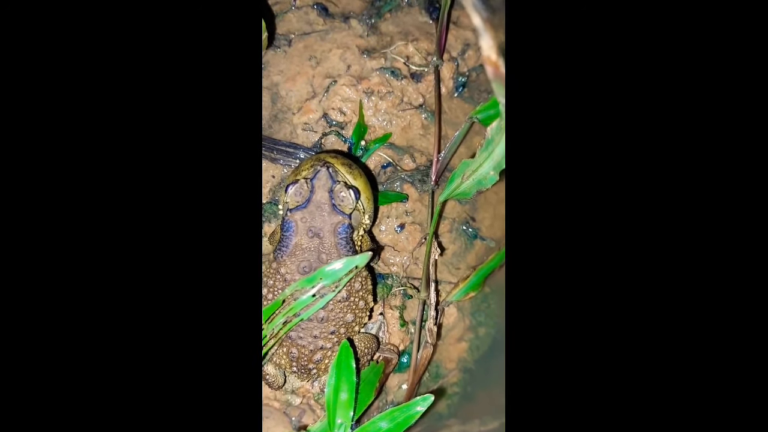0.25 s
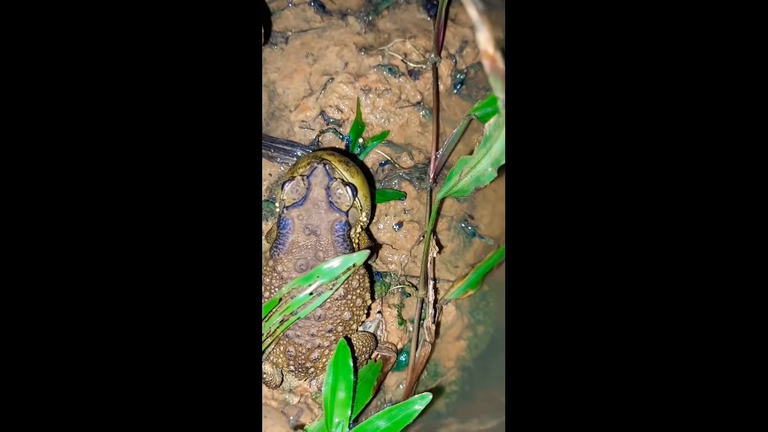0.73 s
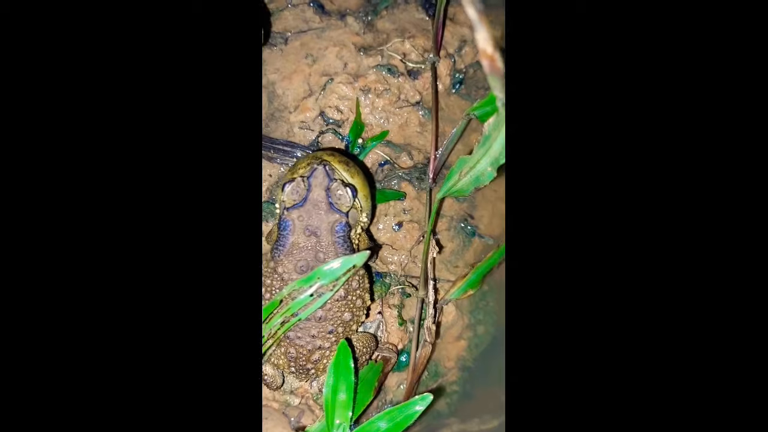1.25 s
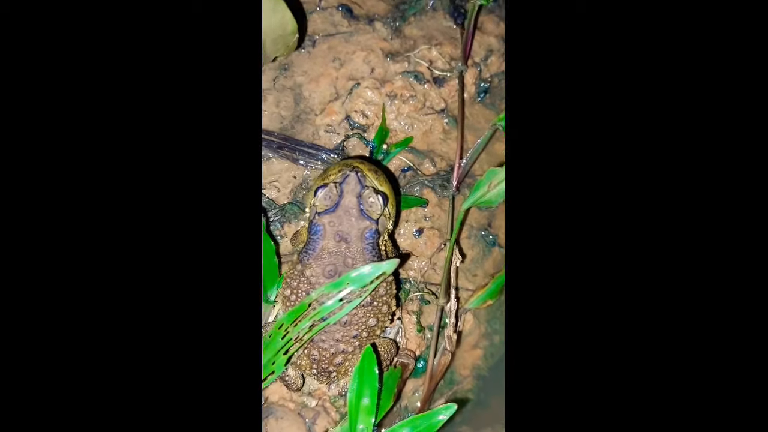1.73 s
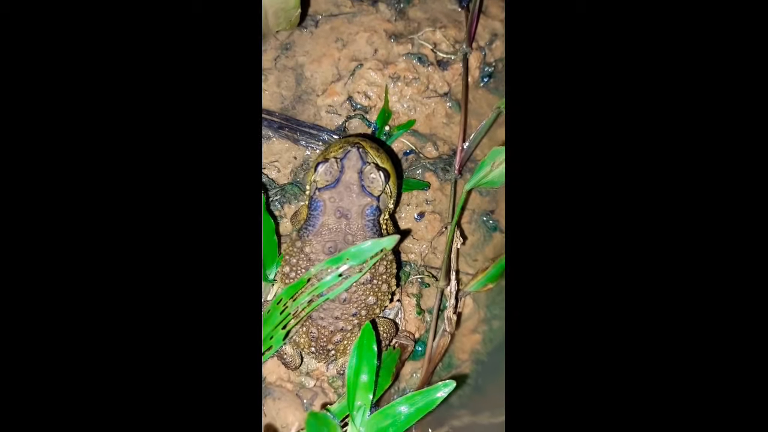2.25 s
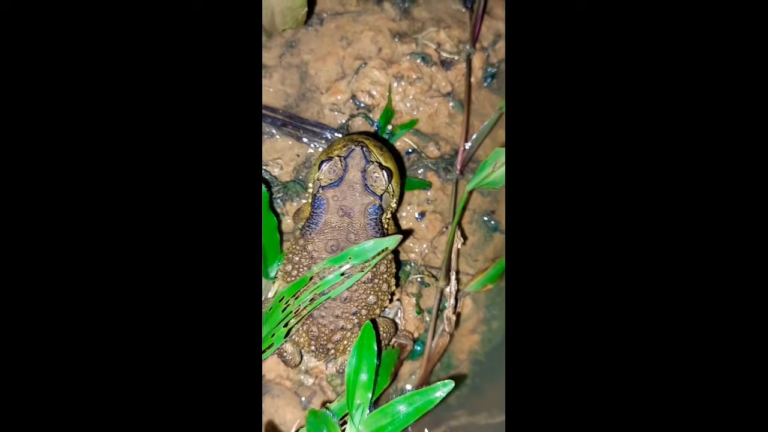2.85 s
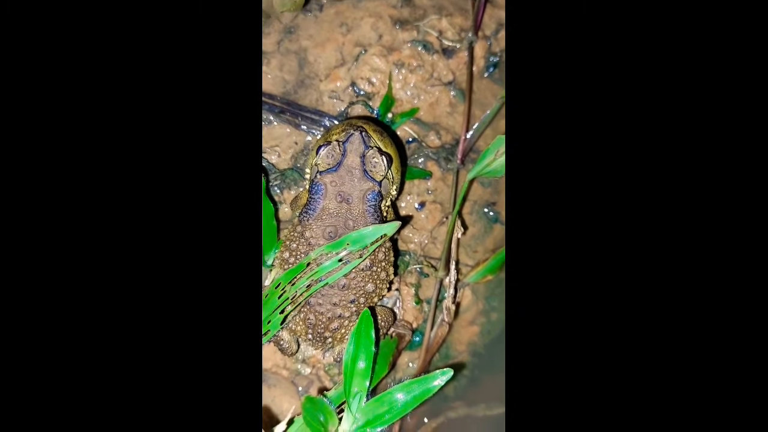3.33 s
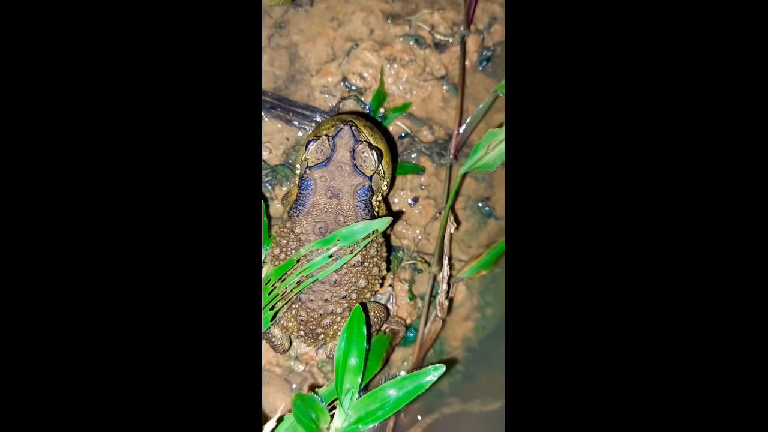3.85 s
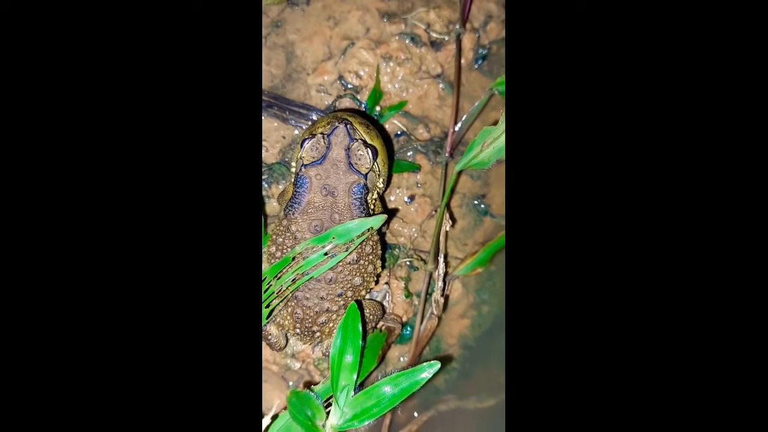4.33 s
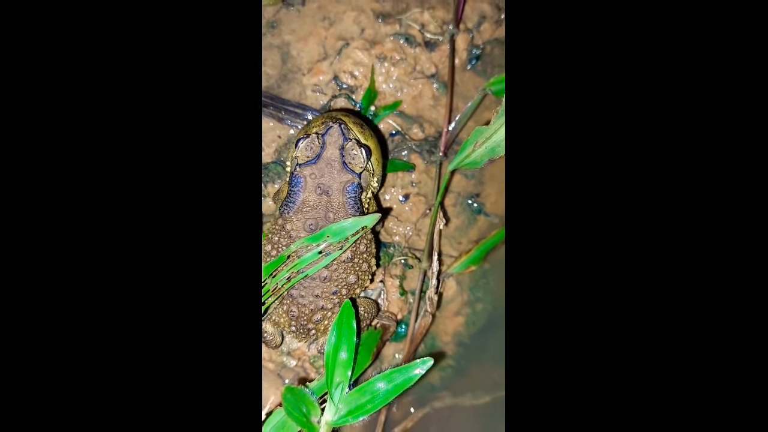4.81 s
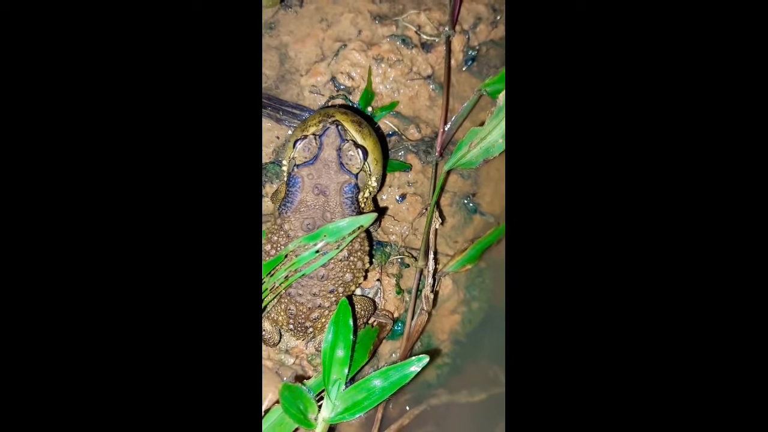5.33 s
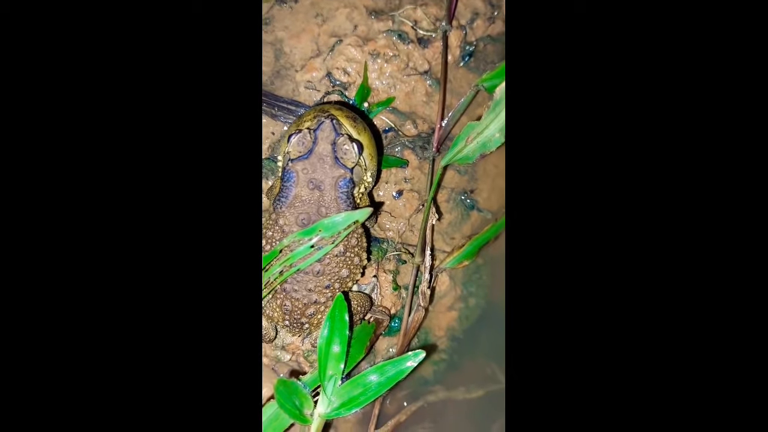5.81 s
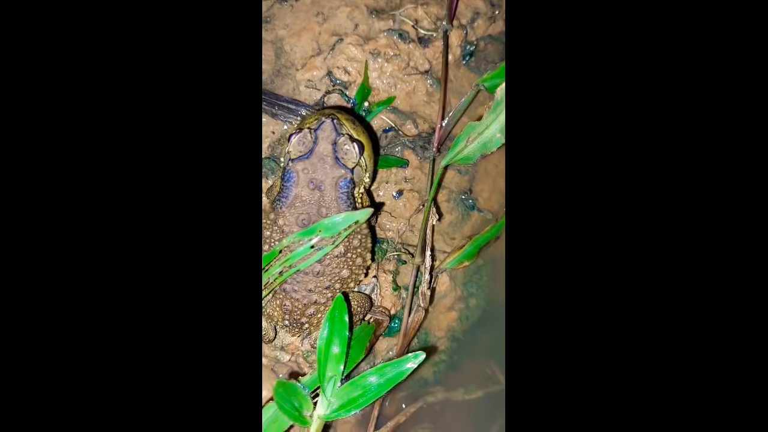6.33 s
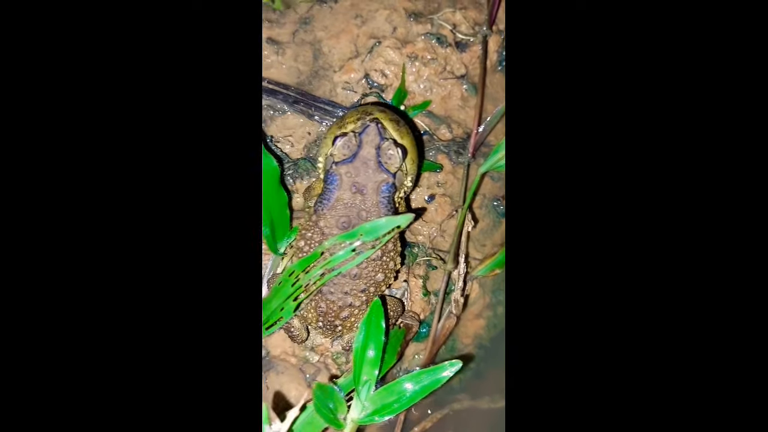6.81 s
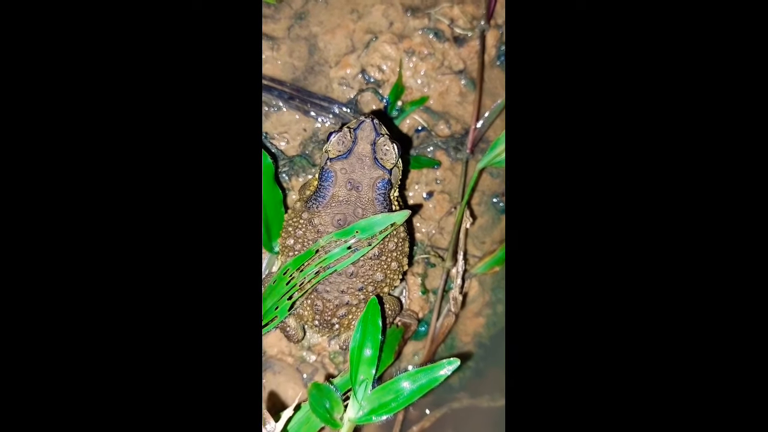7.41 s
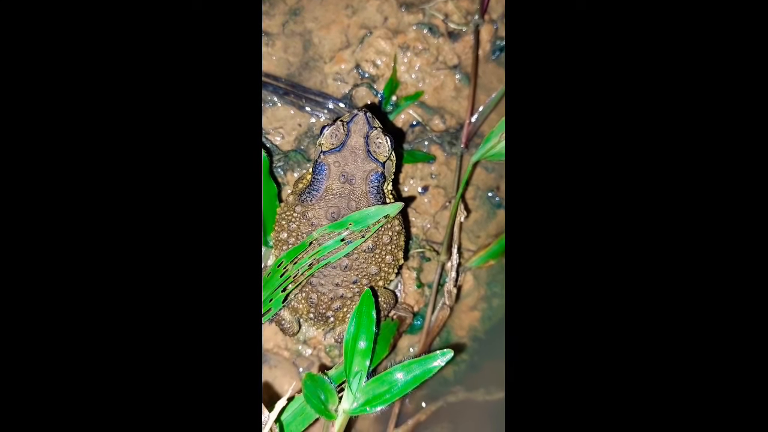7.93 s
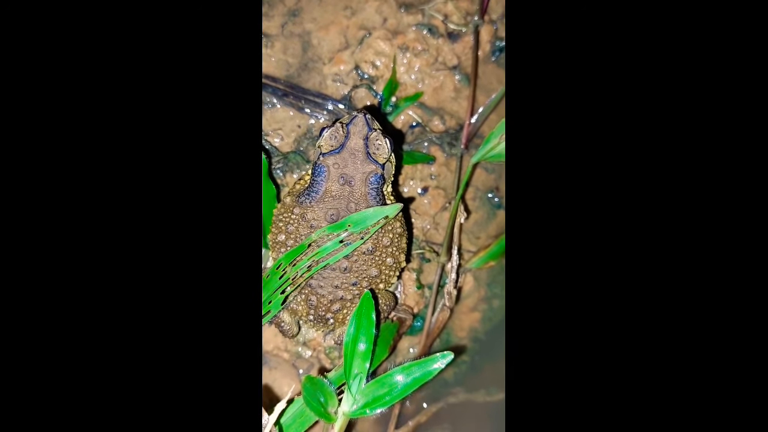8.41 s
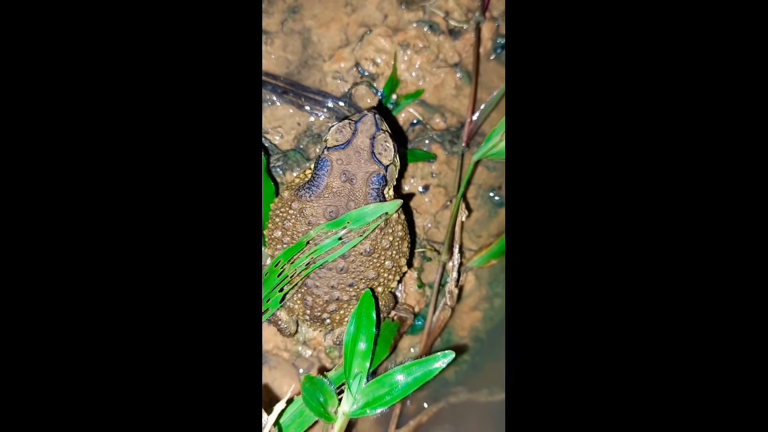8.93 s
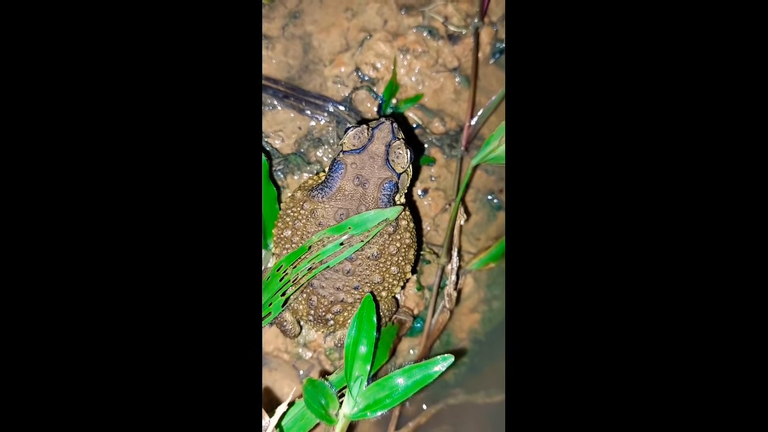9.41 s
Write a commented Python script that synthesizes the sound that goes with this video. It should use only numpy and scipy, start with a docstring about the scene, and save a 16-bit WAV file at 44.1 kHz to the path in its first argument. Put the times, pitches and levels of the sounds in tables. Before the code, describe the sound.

A toad trills loudly from the start, right beside a stereo microphone outdoors at night. Its ringing, pulsed notes hold a steady pitch, about six a second at first, gradually lengthening and slowing to about four; the loudest have a slightly overloaded, clicky edge on the right. A second toad trills behind it, with faint high crickets, a peeping frog and a dryly ticking frog. Near 7 seconds the close toad pauses, and the second toad, the surrounding chorus and soft night air swell up. At about 7.3 seconds a frog on the left adds a second of quick rattling croaks. From 8 seconds another gives thin, high whistles in groups of three while the crickets chirp faster. At about 9.5 seconds the close toad starts again with a few lower, sagging pulses.

```python
"""Night, a stereo microphone right beside a toad. It trills from the start: pulses set its vocal sac ringing in
short bursts, each note closed by a held tone, and the loudest overload the right channel. A neighbour trills
behind it; crickets, a peeping frog and a ticking frog call around. Near 7 s the close toad pauses and the
recorder's gain control lets the chorus swell. A rattling frog joins, then from 8 s a high insect chirping in
threes. In the last moment the close toad starts again with a slack sac."""
import sys
import numpy as np
from scipy import signal
from scipy.io import wavfile
from scipy.ndimage import uniform_filter1d

SR = 44100
rng = np.random.default_rng(int(sys.argv[2]) if len(sys.argv) > 2 else 0)


def unload_audio(sound):
    """Save the sound as a 16-bit wav file, at the path given as the first command line argument."""
    columns = np.transpose(np.atleast_2d(sound))
    # keep every value between -1 and 1, then stretch to whole-number steps
    steps = np.round(np.clip(columns, -1, 1) * 32767)
    wavfile.write(sys.argv[1], SR, steps.astype(np.int16))


N = 426006
TIME = np.arange(N) / SR


def from_db(db):
    """Gain of a level."""
    return 10 ** (np.asarray(db) / 20)


def gain_curve(rows):
    """Gain at every sample from rows of (time [s], level [dB])."""
    return from_db(np.interp(TIME, *np.transpose(rows)))


def bandpass(x, low_hz, high_hz, order=2):
    """Keeps the band between two frequencies."""
    return signal.sosfilt(signal.butter(order, [low_hz, high_hz], "band", fs=SR, output="sos"), x)


def ring(clicks, hz, t60):
    """A resonance: a unit click sets off a dying sine of height 1."""
    r, w = from_db(-60 / (t60 * SR)), 2 * np.pi * hz / SR
    return signal.lfilter([0, np.sin(w)], [1, -2 * r * np.cos(w), r * r], clicks + 1e-18)


def place(x, pan_db, lag_s):
    """A caller's bearing at the microphone: left louder by pan_db, right later by lag_s."""
    return np.array([from_db(pan_db / 2) * x, from_db(-pan_db / 2) * np.interp(TIME - lag_s, TIME, x)])


def since(starts, t, choke_s):
    """Index and age of the latest pulse, and a gate that closes just before the next one."""
    k = np.clip(np.searchsorted(starts, t) - 1, 0, None)
    remaining = np.append(starts[1:], 99)[k] - t
    gate = np.sin(np.pi / 2 * np.clip(remaining / choke_s, 0, 1)) ** 2
    return k, np.maximum(t - starts[k], 0), gate


def night_air(flicker_db=5.0):
    """Far chorus and air: half-octave bands of noise, each flickering on its own."""
    # distant spectrum: (frequency [Hz], relative density [dB])
    spectrum = [(40, -30.5), (80, -12.5), (200, -41), (400, -44.5), (650, -14), (1000, -25.5), (1410, -8.5),
                (2000, -14), (2650, -19.5), (3400, -26), (4300, -28.5), (5400, -25), (7000, -35.5),
                (9000, -30.5), (11000, -59), (15000, -69)]
    hz, density_db = np.transpose(spectrum)
    out, edges = 0, 30 * 2 ** np.arange(0, 9.2, .5)
    white = rng.standard_normal((2, 2, N))
    for k, (low, high) in enumerate(zip(edges, edges[1:])):
        level_db = np.interp(np.log(low * high) / 2, np.log(hz), density_db)
        flicker = np.interp(TIME * 25, np.arange(400), rng.standard_normal(400))
        out = out + bandpass(white[k % 2], low, high) * from_db(level_db + flicker_db * flicker)
    return out / out.std()


def echoes(x):
    """Adds two dull echoes off ground and plants."""
    dull = signal.sosfilt(signal.butter(2, 3000, fs=SR, output="sos"), x)
    return x + sum(from_db(db) * np.roll(dull, int(s * SR), axis=1)
                   for s, db in [(.0117, -27.5), (.023, -31)])


def crickets(duty=.74, strokes_hz=124, fall_hz=700):
    """Wing strokes that fall in pitch, in even chirps with a softer trill between them."""
    # chirp centres: (time [s], chirp number)
    centres = [(0.144, 0), (1.874, 12), (3.595, 24), (5.319, 36), (7.038, 48), (7.608, 52), (8.176, 56),
               (8.608, 59), (9.05, 62), (9.641, 66)]
    # loudness: (time [s], level [dB])
    levels = [(0, -33), (6.9, -36), (7.3, -30.5), (9, -29), (9.66, -27)]
    s, number = np.transpose(centres)
    count = np.interp(TIME, [s[0] - 1, *s, s[-1] + 1], [number[0] - 7, *number, number[-1] + 7])
    inside = ((count + duty / 2) % 1) / duty
    chirp = np.clip(inside / .1, .25, 1) * np.clip((1 - inside) / .09, .25, 1)
    stroke = (strokes_hz * TIME + .004 * np.cumsum(rng.standard_normal(N))) % 1
    sweep = np.cumsum(fall_hz * (.5 - stroke)) / SR
    wings = 0
    for hz, db in [(8980, 0), (9550, -9)]:
        waver = .1 * np.cumsum(rng.standard_normal(N))
        wings += from_db(db) * np.sin(2 * np.pi * (hz * TIME + sweep) + waver)
    return gain_curve(levels) * chirp * np.sin(np.pi * stroke) ** 2 * wings


def whistles(starts, level_db, start_hz, fall_hz, length_s, rough):
    """Short wavering whistles that fall in pitch."""
    k, age, gate = since(starts, TIME, choke_s=.002)
    hz = start_hz * (1 + .02 * rng.standard_normal(len(starts)))
    turns = hz[k] * age - fall_hz * age ** 2 / (2 * length_s)
    waver = rough * np.cumsum(rng.standard_normal(N))
    arch = np.sin(np.pi * np.clip(age / length_s, 0, 1))
    return from_db(level_db[k]) * arch * gate * np.sin(2 * np.pi * turns + waver)


def peeping_frog(every_s=.042, jitter_s=.0036):
    """A small frog whistles on at an uneven pace."""
    # peep peaks: (time [s], relative level [dB])
    levels = [(0, -32.5), (6.9, -36), (7.3, -35), (8.2, -33.5), (9.66, -30.5)]
    beats = np.arange(.02, N / SR, every_s)
    early_late, soft_loud = rng.standard_normal((400, 2))[:len(beats)].T
    starts = beats + jitter_s * np.clip(early_late, -2, 2)
    level_db = np.interp(beats, *np.transpose(levels)) - 2 + 2.17 * soft_loud
    return whistles(starts, level_db, start_hz=3560, fall_hz=320, length_s=.022, rough=.03)


def high_insect(first_s=8.047, every_s=.244, gap_s=.046):
    """Thin whistles in groups of three at a steady pace."""
    # peak of each group: (relative level [dB])
    group_db = (-30, -26, -24.5, -24, -24.5, -26.5, -28)
    # each whistle within a group: (relative level [dB])
    whistle_db = (-5, -1, -0.5)
    starts, level_db = np.transpose([(first_s + every_s * group + gap_s * k, peak_db + db - 10)
                                     for group, peak_db in enumerate(group_db)
                                     for k, db in enumerate(whistle_db)])
    return whistles(starts, level_db, start_hz=5730, fall_hz=850, length_s=.03, rough=.11)


def ticking_frog(first_s=.045, every_s=.0258):
    """A run of dry ticks, each a click with a brief ring."""
    # loudness: (time [s], relative level [dB])
    levels = [(0, -18.5), (6.9, -24), (7.1, -16), (8.4, -22), (8.5, -44), (8.75, -16.5), (9.66, -21.5)]
    beats = np.arange(first_s, N / SR - .01, every_s)
    early_late, soft_loud = rng.standard_normal((500, 2))[:len(beats)].T
    clicks = np.zeros(N)
    clicks[((beats + .001 * early_late) * SR).astype(int)] = from_db(2.5 * soft_loud)
    return gain_curve(levels) * ring(bandpass(clicks + 1e-18, 1800, 4000), hz=2730, t60=.0041)


def rattling_frog(first_s=7.299, every_s=.0775, count=14):
    """Five uneven pulses a croak ring a wide throat; the croaks slow down and grow louder."""
    # throat resonances: (frequency [Hz], t60 [s], level [dB])
    throat = [(654, 0.044, 2), (2110, 0.027, 7.5), (2440, 0.035, -1.5)]
    clicks, pulse = np.zeros(N), np.arange(5)
    for k, jitter in enumerate(rng.standard_normal((count, 5))):
        start = first_s + every_s * k + .0002 * k ** 2
        croak_db = -30 + .2254 * k + 1.5 * jitter[0]
        times = start + .0088 * pulse + .000438 * jitter
        clicks[(times * SR).astype(int)] = from_db(croak_db + .5 * jitter - .59 * pulse)
    soft = bandpass(1.21 * clicks + 1e-18, 480, 3000, order=3)
    return sum(from_db(db) * ring(soft, hz, t60) for hz, t60, db in throat)


def toad_pulses(notes, rest, per_pulse, opening_extra, hurry, opening_gap_s, gap_s, closing_gap_s):
    """Spreads each note's bursts, more pulses meaning a longer wait: rows of (time [s], held tone [s])."""
    pulses, previous = [], -1
    for start, close, held_ms, (*counts, closing_count) in notes:
        waits = rest + per_pulse * np.array(counts, float)      # relative lengths
        waits[0] += opening_extra * counts[0]
        waits[-1] -= hurry
        bursts = start + (close - start) * (np.cumsum(waits) - waits) / waits.sum()
        for s, count in zip(bursts, counts):
            step = opening_gap_s if s - previous > .045 else gap_s
            pulses += [(s + step * k, 0) for k in range(count)]
            previous = pulses[-1][0]
        pulses += [(close + closing_gap_s * k, 0) for k in range(closing_count)]
        pulses.append((pulses[-1][0] + .0049, held_ms / 1000))
    return sorted(pulses)


def vocal_sac(pulses, modes, lag_s, fall_hz, held_db, rise_s, damp_s, octave_db, third_mode_rad):
    """Each pulse restarts a toad's ringing sac; the closing burst runs into a held tone that falls."""
    starts, held_s = np.transpose(pulses)
    wait = np.diff(starts, prepend=-1)
    opens_note, opens_burst = wait > .035, wait > .008
    click_db = 3.5 * opens_note + 7.5 * opens_burst      # first pulses click more
    detune, soft_loud, early_late = rng.standard_normal((len(starts), 3)).T
    pulse_db = .7 * soft_loud + .5 * opens_note
    starts = starts - .0001 + .00019 * np.clip(early_late, -2, 2)
    out = np.zeros((2, N))
    for side in (0, 1):
        k, age, gate = since(starts, TIME - side * lag_s, choke_s=.0016)
        live = age < .04
        k, age, gate = k[live], age[live], gate[live]
        holds = held_s[k] > 0
        stretched = age + .00008 * (1 - np.exp(-age / .00018))      # each pulse starts sharp
        for mode, (hz, t60, *side_db, lag_rad) in enumerate(modes):
            decay = from_db(-60 * age / t60) * np.exp(-(age / damp_s) ** 2)
            turns = hz * (1 + .008 * detune[k]) * stretched
            if mode == 1:      # the main resonance is driven on through the held tone
                fade = np.cos(np.pi / 2 * np.clip((age - held_s[k]) / .007 + .6, 0, 1))
                decay = np.where(holds, from_db(held_db) * fade, decay)
                turns -= holds * fall_hz * age ** 3 / (3 * (held_s[k] + .0069) ** 2)
            rise = 1 - np.exp(-(age * max(hz / 2000, 1) / rise_s) ** 2)      # the click speaks first
            phase = 2 * np.pi * (turns + side * hz * lag_s) - side * lag_rad
            tone = np.sin(phase + (mode == 2) * third_mode_rad)
            octave = (mode == 1) * holds * from_db(octave_db) * np.sin(2 * phase)
            gain = from_db(side_db[side] + pulse_db[k] + (hz > 4000) * click_db[k])
            out[side, live] += gain * rise * decay * gate * (tone + octave)
    return out


def neighbour_toad(held_ms=10.8):
    """The toad farther back: long notes take one burst more, and fill out when the close toad pauses."""
    # notes: (start [s], closing burst [s])
    times = [(.1167, .17), (.213, .2734), (.4032, .465), (.5451, .605), (.707, .7651), (.8796, .94),
             (.992, 1.0546), (1.146, 1.208), (1.29, 1.352), (1.4361, 1.5), (1.5895, 1.65), (1.725, 1.783),
             (1.88, 1.9416), (2.03, 2.092), (2.19, 2.25), (2.3437, 2.405), (2.5009, 2.555), (2.648, 2.7089),
             (2.82, 2.8833), (2.968, 3.03), (3.1189, 3.18), (3.271, 3.3334), (3.442, 3.522),
             (3.615, 3.6804), (3.78, 3.847), (3.95, 4.012), (4.119, 4.18), (4.2827, 4.3398),
             (4.452, 4.5319), (4.63, 4.7), (4.785, 4.85), (4.968, 5.033), (5.13, 5.2083), (5.29, 5.355),
             (5.4663, 5.53), (5.642, 5.7219), (5.83, 5.9106), (5.995, 6.06), (6.1644, 6.228),
             (6.32, 6.3996), (6.495, 6.56), (6.6596, 6.725), (6.84, 6.9218), (7.0201, 7.0817),
             (7.181, 7.2444), (7.3402, 7.4041), (7.5021, 7.5672), (7.6656, 7.7439), (7.8411, 7.9063),
             (8.0113, 8.0759), (8.1735, 8.2402), (8.339, 8.4193), (8.5191, 8.5853), (8.6877, 8.7673),
             (8.8706, 8.9504), (9.0534, 9.1323), (9.2317, 9.3147), (9.4138, 9.4943), (9.5925, 9.657)]
    # loudness: (time [s], level [dB])
    effort = [(0, 0.24), (3, 0.23), (6.8, 0.2), (7.4, 6.4), (7.9, 0.56), (8.4, 3.5), (9.66, 4.2)]
    # sac resonances: (frequency [Hz], t60 [s], left [dB], right [dB], right lag [rad])
    modes = [(966, 0.029, -35, -30, -1.5), (1396.5, 0.062, -6.5, 0, -3.5), (1636, 0.036, -14, -9.5, -4.5),
             (2685, 0.015, -35.5, -38, 1.3)]
    short, shy, full = (3, 1, 2, 4), (3, 1, 1, 1, 4), (3, 1, 2, 1, 4)      # pulses per burst
    notes = [(start, close, held_ms, short if close - start < .072 else shy if start < 6.8 else full)
             for start, close in times]
    pulses = toad_pulses(notes, rest=7.8, per_pulse=4.92, opening_extra=2.2, hurry=.28,
                         opening_gap_s=.0063, gap_s=.0074, closing_gap_s=.0061)
    return gain_curve(effort) * vocal_sac(pulses, modes, lag_s=-.00055, fall_hz=200, held_db=-3.5,
                                          rise_s=.00084, damp_s=.0077, octave_db=-27, third_mode_rad=.15)


def slack_sac():
    """The close toad starts again: low, sagging pulses with a faint octave and a brief subharmonic."""
    # pulses: (time [s], relative level [dB], pitch [Hz], t60 [s])
    pulses = [(9.545, 13, 1190, 0.0112), (9.556, 2.5, 1190, 0.029), (9.58, 8, 1156, 0.071),
              (9.606, 5, 1196, 0.13), (9.6134, 12, 1310, 0.019), (9.623, 9, 1290, 0.029),
              (9.628, 6.5, 1211, 0.55)]
    starts, level_db, hz, t60 = np.transpose(pulses)
    k, age, gate = since(starts, TIME, choke_s=.00068)
    phase = 2 * np.pi * hz[k] * age * (1.0197 - 1.7 * age)
    body = np.sin(phase) + .05 * np.sin(2 * phase) + .34 * np.exp(-age / .0032) * np.sin(phase / 2)
    rise = 1 - np.exp(-(age / .00074) ** 2)
    decay = from_db(level_db[k] - 5 - 60 * age / t60[k])
    return place(rise * decay * gate * body, pan_db=-4, lag_s=.00031)


def close_toad():
    """The toad right at the microphone: its notes lengthen and soften as the trill goes on."""
    # notes: (start [s], closing burst [s], held tone [ms], pulses in each burst)
    notes = [(.0136, .0488, 11.4, (2, 2, 5)), (.1495, .1859, 9.8, (2, 2, 5)),
             (.2908, .3439, 16.5, (2, 2, 2, 4)), (.4416, .4908, 10.7, (2, 2, 2, 5)),
             (.5995, .6665, 10, (2, 2, 2, 2, 5)), (.7769, .8281, 11.4, (2, 2, 2, 5)),
             (.9349, 1.0022, 9.5, (2, 2, 2, 2, 5)), (1.1097, 1.1807, 13.5, (2, 2, 2, 2, 4)),
             (1.2864, 1.3549, 9.1, (2, 2, 2, 2, 5)), (1.4621, 1.534, 13.5, (2, 2, 2, 2, 4)),
             (1.6397, 1.708, 11.1, (2, 2, 2, 2, 5)), (1.8163, 1.8852, 12.1, (2, 2, 2, 2, 5)),
             (1.9886, 2.0557, 11.7, (2, 2, 2, 2, 5)), (2.1666, 2.2568, 14.2, (2, 2, 2, 2, 2, 4)),
             (2.3703, 2.4392, 12.4, (2, 2, 2, 2, 5)), (2.5459, 2.632, 9.8, (2, 2, 2, 2, 2, 5)),
             (2.7436, 2.8292, 10.1, (2, 2, 2, 2, 2, 5)), (2.9375, 3.0084, 9.3, (3, 1, 2, 2, 8)),
             (3.1379, 3.2266, 10.4, (2, 2, 2, 2, 2, 4)), (3.3393, 3.41, 13.8, (3, 2, 2, 2, 7)),
             (3.5387, 3.6243, 12.2, (2, 1, 2, 2, 2, 5)), (3.7257, 3.8136, 9.3, (3, 2, 2, 1, 2, 5)),
             (3.9226, 4.0117, 8.1, (3, 2, 2, 2, 2, 5)), (4.1245, 4.2309, 9, (3, 2, 2, 1, 2, 2, 5)),
             (4.3473, 4.4502, 13.7, (2, 1, 2, 1, 2, 2, 7)), (4.5767, 4.6812, 10, (3, 1, 2, 2, 2, 2, 5)),
             (4.8029, 4.8898, 8.7, (2, 2, 2, 1, 2, 8)), (5.0165, 5.1211, 9.9, (3, 2, 2, 1, 2, 2, 5)),
             (5.2385, 5.3631, 8.1, (3, 2, 1, 2, 1, 2, 2, 5)),
             (5.4959, 5.6357, 13.7, (3, 2, 1, 1, 2, 1, 2, 2, 4)),
             (5.7553, 5.8615, 11.4, (3, 1, 2, 1, 2, 2, 5)), (5.982, 6.103, 8.1, (2, 2, 2, 1, 2, 2, 2, 5)),
             (6.2208, 6.3299, 10.4, (3, 2, 2, 1, 2, 2, 5)), (6.4881, 6.5946, 11.4, (3, 1, 2, 1, 2, 2, 5)),
             (6.7074, 6.8311, 8.7, (3, 2, 1, 2, 2, 2, 2, 5))]
    # calling effort: (time [s], level [dB])
    effort = [(0, 16), (3, 14), (7, 11)]
    # the sac's ring and, above 4 kHz, the bright, overloaded click at the start of each pulse:
    # (frequency [Hz], t60 [s], left [dB], right [dB], right lag [rad])
    ring_and_click = [(653, 0.022, -25, -21.5, 0.71), (1431.3, .03, -3.5, -0.5, 2.386),
                      (1821, 0.0091, -10, -8.5, 2.85), (2980, 0.012, -36, -32, 2.34),
                      (4440, 0.0052, -38.5, -41, 3.7), (7100, 0.0028, -43, -45.5, 3.1)]
    # the thin top of the click: same columns
    sizzle = [(12000, .003, -42, -43, 2.6)]
    pulses = toad_pulses(notes, rest=21, per_pulse=1.45, opening_extra=3.1, hurry=.76,
                         opening_gap_s=.0069, gap_s=.0062, closing_gap_s=.0059)
    trill = vocal_sac(pulses, ring_and_click + sizzle, lag_s=.00008, fall_hz=168, held_db=-4.5,
                      rise_s=.00087, damp_s=.034, octave_db=-42.5, third_mode_rad=2.51)
    return gain_curve(effort) * trill


def scene():
    """What reaches the microphone: two toads, the crickets and frogs around them, the night air."""
    toads = close_toad() + neighbour_toad() + slack_sac()
    chorus = (place(crickets(), pan_db=-.59, lag_s=.0005822)
              + place(high_insect(), pan_db=.3, lag_s=.00002)
              + place(peeping_frog(), pan_db=.3, lag_s=.00005)
              + place(rattling_frog(), pan_db=-6, lag_s=.0001)
              + place(ticking_frog(), pan_db=-2.5, lag_s=.0001))
    return echoes(toads + chorus) + from_db(-33) * night_air()


def record(dry):
    """The recorder: lopsided capsules, gain control, clipping, a top cut at 16 kHz."""
    attack_s, release_s = .00027, .6
    squared = dry ** 2      # the capsules' even term adds an octave and a thump
    octave = .0015 * (squared - uniform_filter1d(squared, SR // 20))
    thump = .0087 * bandpass(squared, 30, 118)
    capsule = dry + octave + thump
    over_db = np.maximum(20 * np.log10(np.abs(capsule).max(axis=0) + 1e-9), 1e-3)
    over_db[0] = 12      # already turned down at the start
    # after each peak the cut in dB dies away exponentially
    held_db = np.exp(np.maximum.accumulate(np.log(over_db) + TIME / release_s) - TIME / release_s)
    grip = 1 / (attack_s * SR)
    cut_db = signal.lfilter([grip], [1, grip - 1], held_db, zi=[over_db[0]])[0]
    clipped = np.clip(capsule * from_db(.2941 - cut_db), -1, 1)
    return np.clip(signal.sosfilt(signal.cheby2(10, 60, 16000, fs=SR, output="sos"), clipped), -1, 1)


dry = scene()
out = record(dry)
unload_audio(out)
```